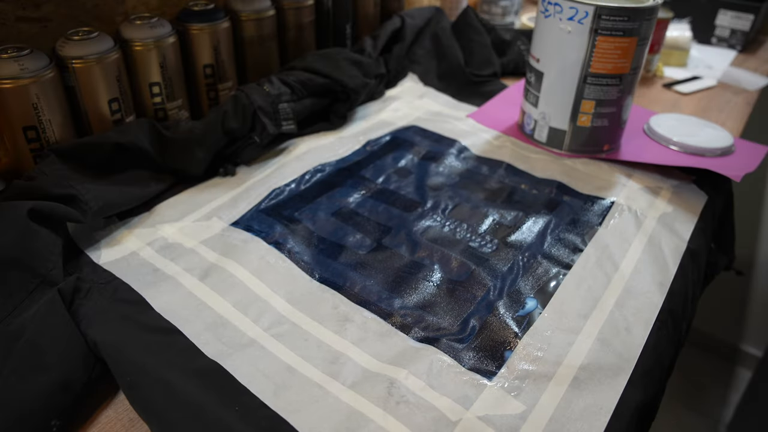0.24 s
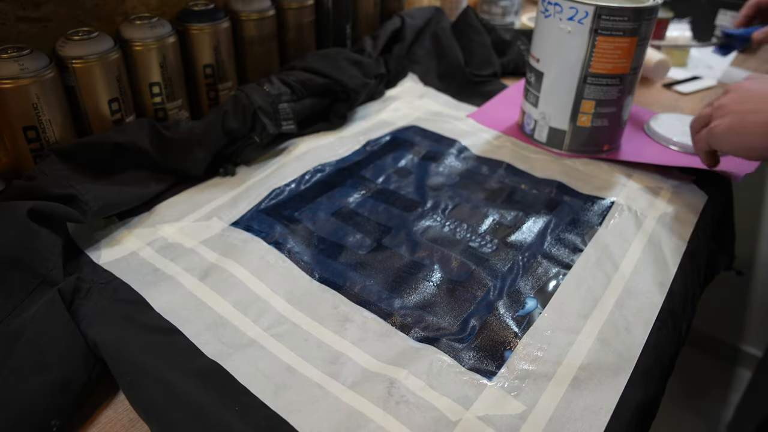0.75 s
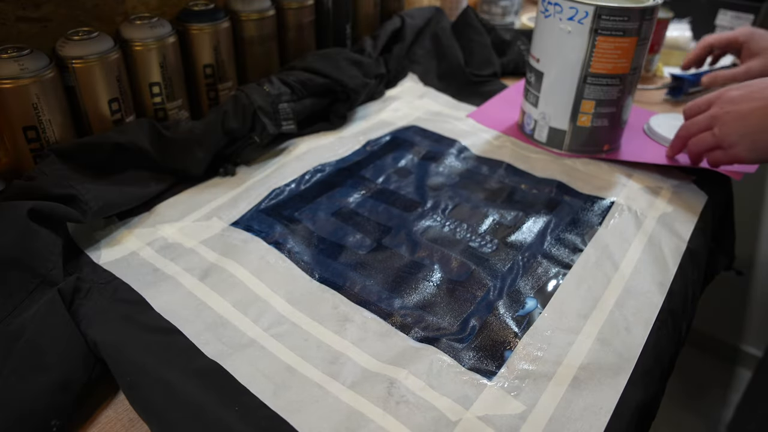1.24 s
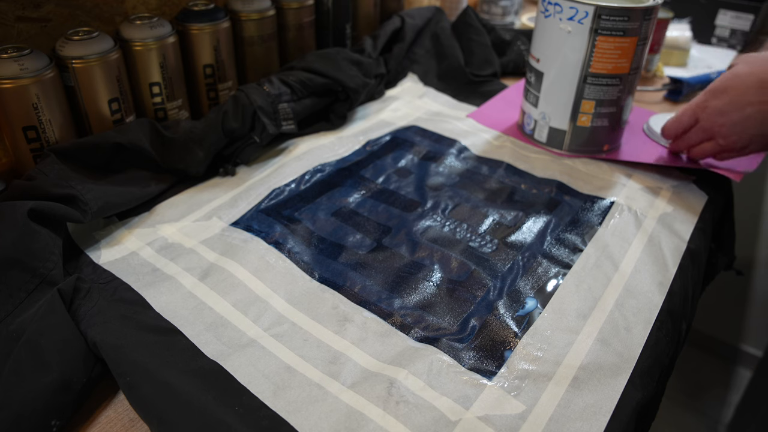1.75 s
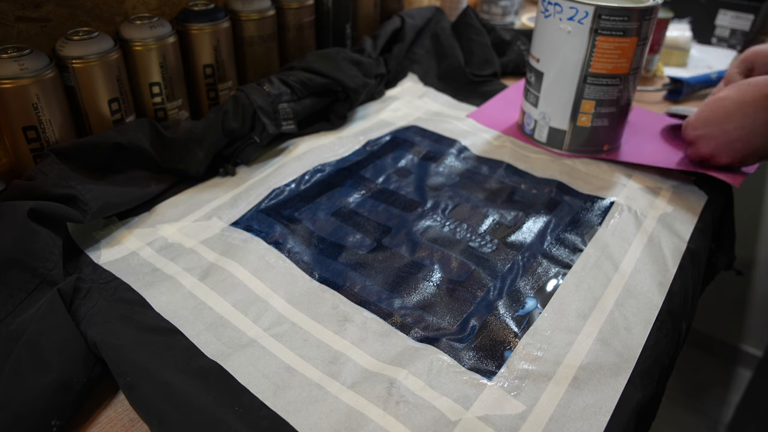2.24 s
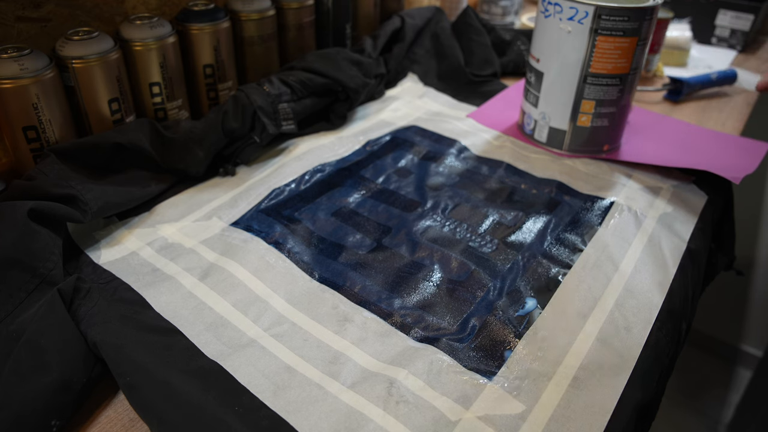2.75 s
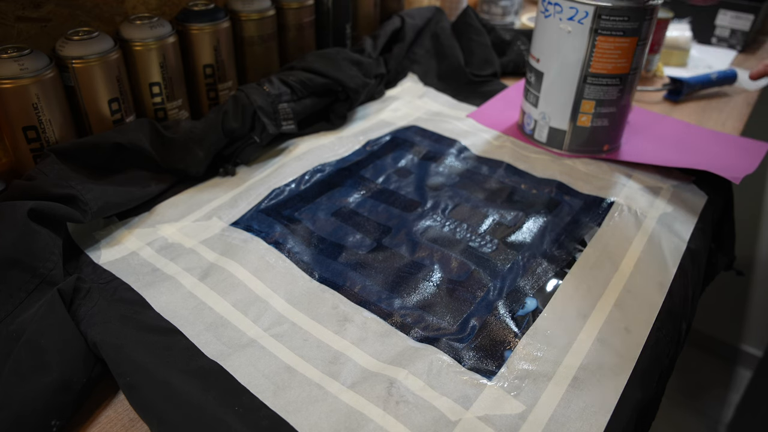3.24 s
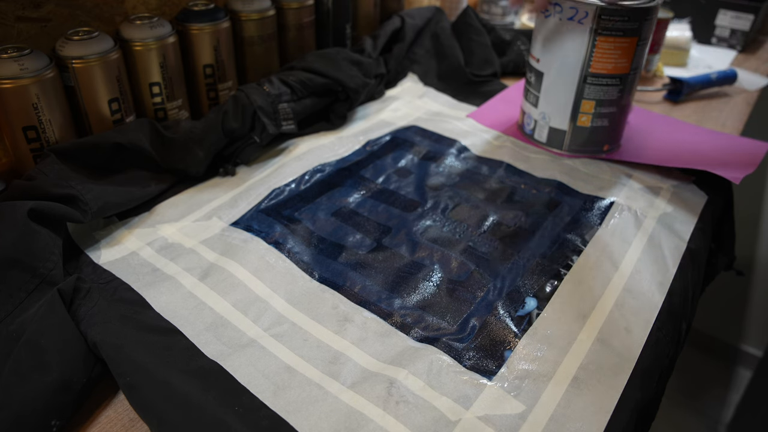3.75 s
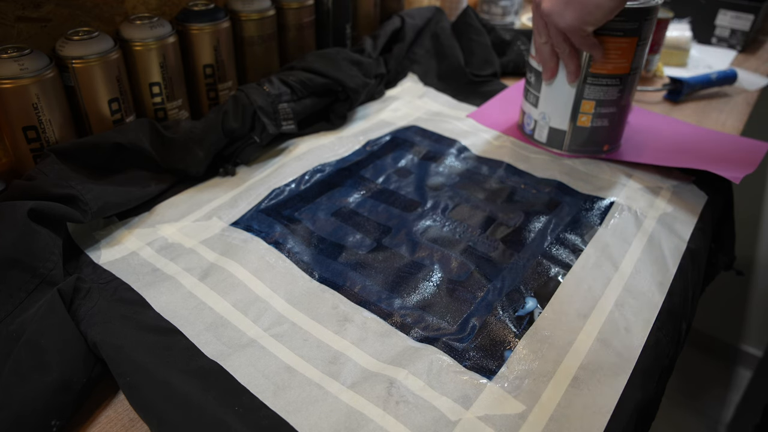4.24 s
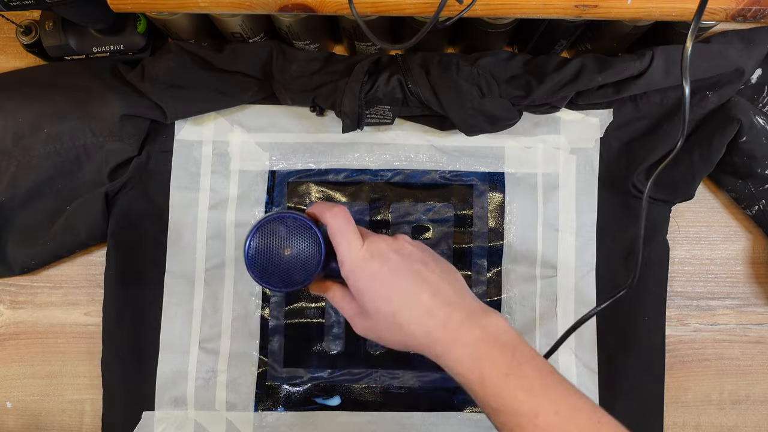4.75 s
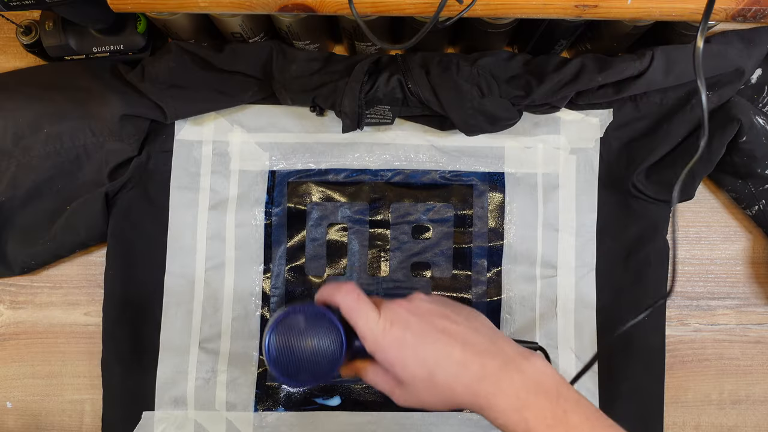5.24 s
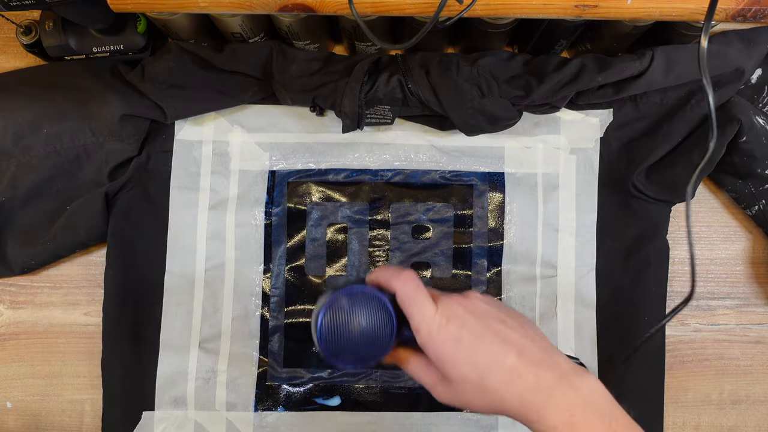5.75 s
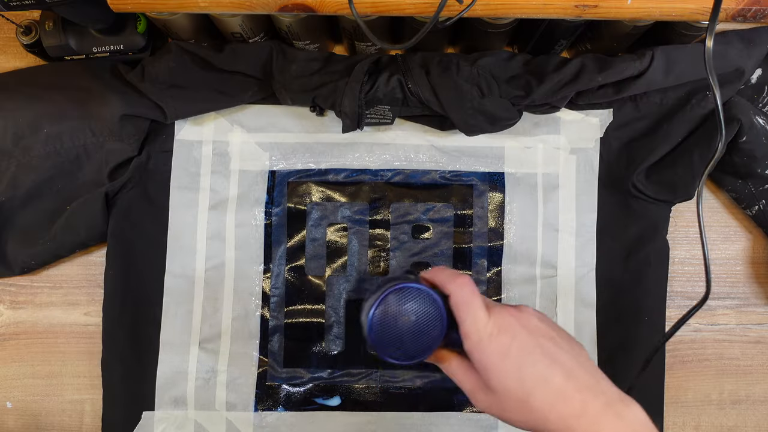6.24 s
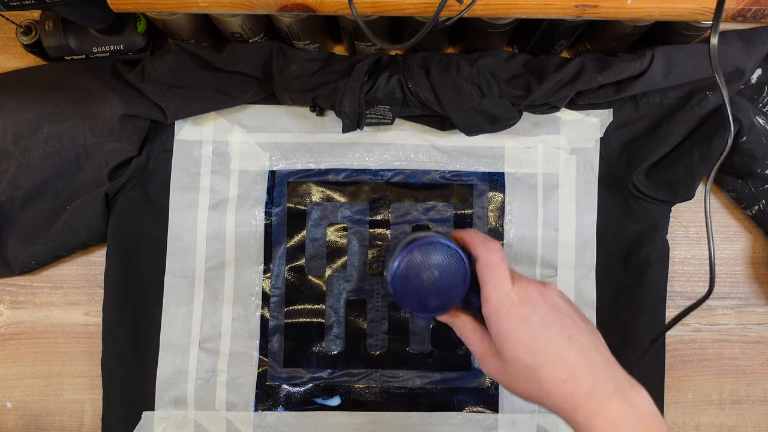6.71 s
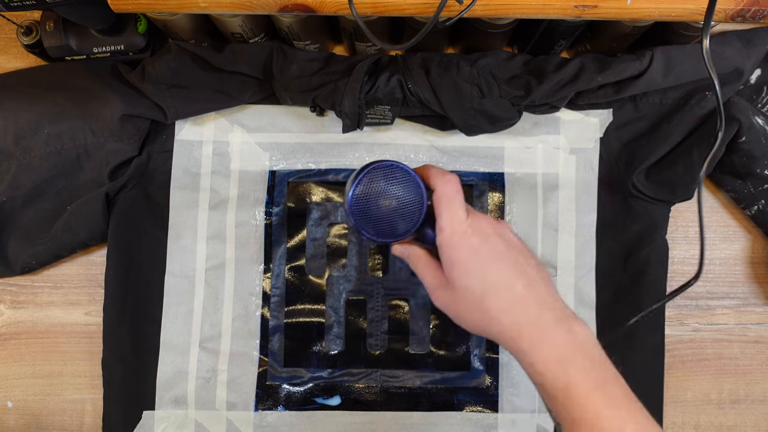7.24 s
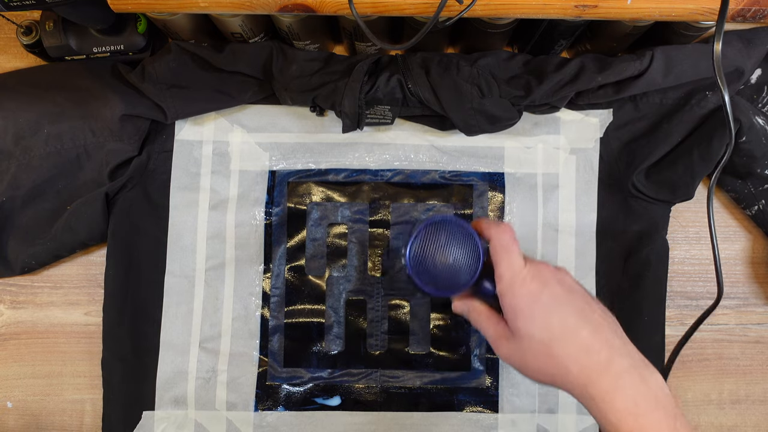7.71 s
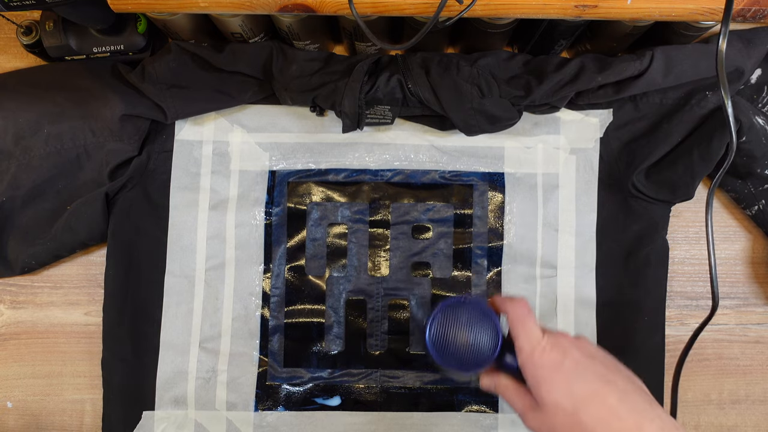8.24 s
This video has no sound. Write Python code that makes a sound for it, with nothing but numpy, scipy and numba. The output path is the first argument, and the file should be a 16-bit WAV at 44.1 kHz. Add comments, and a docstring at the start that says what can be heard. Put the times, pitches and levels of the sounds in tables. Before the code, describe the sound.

In a quiet small workshop, a roller handle clicks and taps, then drops on the table in a quick, fading run of bounces. Hands rub over card, a tin lid scrapes off the edge and clacks down brightly. Soft bumps follow. Suddenly a hair dryer cuts in with a loud hollow bang close to the microphone, then whines and roars steadily, wavering as it is waved.

```python
"""A small workshop, at the table: a paint roller clicks, is put down and bounces.
A tin lid is slid off a card and clacked down; a few soft bumps follow.
A hair dryer cuts in, with a hollow bang close to the microphone, and is waved over the cloth.
Its seven-blade fan whines as a sine tone over rushing air made of coloured noise.
Blows are noise cracks with damped ringing modes; rubbing is grainy noise in slow swells."""
import sys
import numpy as np
from scipy import signal
from scipy.fft import rfft, irfft, next_fast_len
from scipy.io import wavfile
from scipy.ndimage import uniform_filter1d, map_coordinates
from numba import njit

SR = 44100
rng = np.random.default_rng(int(sys.argv[2]) if len(sys.argv) > 2 else 0)


def wrap_up_sound(samples):
    """Save the sound to the file named by the first command line argument, as 16-bit audio."""
    columns = np.atleast_2d(samples).T
    # keep every value between -1 and 1, then stretch to whole-number steps
    tamed = np.clip(columns, -1, 1)
    steps = np.round(tamed * 32767).astype(np.int16)
    wavfile.write(sys.argv[1], SR, steps)


N = 373968
T = np.arange(N) / SR
RING_T = T[:SR]  # one second for each blow to ring out

# In all blow tables brightness_db counts relative to that of the strongest blow of its table.
# Steady murmur of the workshop: pitch_hz, level_db
SHOP_COLOUR = [(20, -13), (44, -11), (110, -11.5), (178, -11.5), (209, -8.5), (289, -10.5), (410, -8.5),
               (567, -11.5), (871, -15.5), (1200, -17), (15500, -39.5)]
SHOP_DB = -64
# Strokes of hand, sleeve and lid over card and cloth: peak_s, rise_s, fall_s, rub_db, hiss_db
STROKES = [(0.36, 0.7, 0.6, -61.5, -68.5), (0.79, 0.12, 0.48, -55, -62.5), (1.25, 0.12, 0.73, -54, -63),
           (1.66, 0.1, 0.4, -52, -63.5), (2.0, 0.078, 0.15, -54, -61.5), (2.19, 0.25, 0.45, -57, -59),
           (2.335, 0.025, 0.051, -48.5, -46.5), (3.55, 0.12, 0.31, -70, -70.5), (4.15, 0.19, 1, -58, -69.5)]
# Low rubbing and high hiss of the strokes: pitch_hz, level_db
RUB_COLOUR = [(240, -30), (400, -6), (515, -8.5), (1240, -2), (1390, -3), (4090, -9.5), (5000, -14),
              (6500, -44.5), (11000, -120)]
HISS_COLOUR = [(2650, -43), (4500, -8.5), (5860, -1.5), (6360, 0), (7130, -4.5), (8680, -4.5), (10700, -17),
               (13800, -17.5), (15500, -23)]
# Dull taps, each with one short resonance and its overtone: start_s, level_db, pitch_hz
TAPS = [(0.079, -40.5, 1100), (0.314, -47.5, 930), (0.421, -47.5, 436), (0.469, -37, 1116),
        (0.545, -36, 1150), (0.697, -40.5, 1270), (1.024, -55, 354), (1.192, -36.5, 1300),
        (3.288, -38, 323), (3.320, -50, 326), (3.456, -43.5, 236), (3.486, -46, 224)]
# Roller handle clicks: start_s, level_db, brightness_db
CLICKS = [(0.119, -14, -12.5), (0.169, -39.5, -1), (0.5095, -30, -10), (0.515, -36.5, 2.5),
          (1.098, -39.5, -6), (1.197, -30.5, -11)]
# Crack of the handle: pitch_hz, level_db
CLICK_COLOUR = [(120, -48), (200, -26), (419, -16.5), (560, -24), (775, -4.5), (1330, -4), (2130, -5.5),
                (2650, -9.5), (4010, -14.5), (4640, -22), (5260, -19.5), (5860, -31), (15000, -58)]
# Ringing of the handle: pitch_hz, level_db, t60_s
HANDLE_MODES = [(1200, -4, 0.12), (1310, 4, 0.071), (1610, -6, 0.053), (1770, -19, 0.052), (1950, -3, 0.09),
                (2940, -25, .05), (3327, -40, .07), (3920, -6, 0.071)]
# Soft bumps on the table: start_s, level_db, brightness_db
BUMPS = [(0.325, -52.5, -13), (3.286, -41.5, -11), (3.453, -57, 9), (3.811, -41, 4), (3.816, -47, -6),
         (3.952, -36, 2), (3.957, -40.5, 1), (3.993, -48, -16), (4.373, -53.5, 13.5), (4.397, -54, 6)]
# Crack of the bumps: pitch_hz, level_db
BUMP_COLOUR = [(24, -45), (40, -8.5), (193, 0), (283, -8), (351, -19), (552, -6), (849, -26), (934, -10.5),
               (1130, -17.5), (1660, -15), (12000, -48), (15600, -81), (22000, -120)]
# Ringing of the bumped table: pitch_hz, level_db, t60_s
BUMP_MODES = [(203, -8, 0.12), (233, -1, 0.12), (358, 12, 0.11)]
# The roller drops on the table: first blow, first flight, share of speed kept by each rebound
DROP_S, FIRST_FLIGHT_S, REBOUND = 1.254, 0.076, 0.795
# First blow; loss of level and of treble per bounce
DROP_DB, BOUNCE_LOSS_DB, BOUNCE_DULLING_DB = -20.5, 2.17, 0.76
# Crack of roller on table: pitch_hz, level_db
BOUNCE_COLOUR = [(45, -31), (90, 7), (250, -12), (352, 2), (455, -16), (600, -8.5), (844, -10.5),
                 (1090, -9), (1760, -14.5), (3050, -9), (4370, -21.5), (5850, -11), (8100, -25),
                 (15000, -34.5)]
# Ringing of the table under the roller: pitch_hz, level_db, t60_s
TABLE_MODES = [(76, -2, 0.22), (98.5, 3, 0.23), (182.5, 0.5, 0.15), (346, -7.5, 0.16), (605, -7, 0.11),
               (1050, -9, 0.093), (2156, -5.5, 0.077), (3000, 1, 0.031), (5830, -11, 0.1),
               (7220, -10, 0.047)]
# The lid's rim scrapes over the table edge: peak_s, rise_s, fall_s, level_db
SCRAPES = [(2.248, 0.028, 0.22, -45), (2.335, 0.049, 0.066, -39.5)]
# Ringing of the scraped rim: pitch_hz, level_db, t60_s
RIM_MODES = [(639, -10, 0.15), (913, -5, 0.099), (1084, -3, .06), (1180, -4, 0.05), (1278, -2, 0.083),
             (1470, -11, 0.11), (1520, -16, 0.19), (1996, -10.5, 0.15)]
# The lid rings as it slips off the edge, then is clacked down: start_s, level_db, brightness_db
LID_BLOWS = [(2.340, -34, -29), (2.9415, -12, 3)]
# Crack of the lid: pitch_hz, level_db
LID_COLOUR = [(40, -38), (100, -18.5), (380, -12), (480, -7), (825, -14), (1290, -3.5), (1620, -12),
              (1850, -14.5), (2600, -1), (3850, -14), (4500, -13), (6900, -15.5), (7600, -25), (15500, -44)]
# Ringing of the lid: pitch_hz, level_db, t60_s
LID_MODES = [(474.5, -10.5, 0.42), (584.4, -8, 0.25), (1285, -5.5, 0.15), (1386, -13.5, 0.15),
             (1627, 6, 0.18), (1650, -11, .15), (1980, -7.5, 0.21), (2370, -5, 0.18), (2566, 2.5, 0.18),
             (2600, -5.5, .14), (2790, -6, 0.13), (2910, -11.5, .2), (3080, -2.5, 0.2), (3155, -9, 0.12),
             (3770, -6, 0.26), (3767, -5, 0.24), (3980, -10, .26), (4080, -10, .11), (4930, -7.5, .1),
             (5240, -10, 0.12), (6000, -17.5, .18), (6400, -14, .18), (6650, -13, .16)]
DRYER_ON_S, BLADES = 4.471, 7
# Motor speed as the blade rate: start_s, pitch_hz
BLADE_RATE = [(4.5, 1393), (4.78, 1390), (4.94, 1401), (5.7, 1384), (6.82, 1373), (8.21, 1387),
              (8.48, 1377)]
# Whine, coming and going as the dryer is waved, before the fan's overall gain: start_s, level_db
WHINE = [(4.66, -36.5), (4.72, -38.5), (5.04, -32), (5.18, -40), (5.3, -34), (5.36, -39.5), (6.1, -43),
         (6.76, -40.5), (6.8, -35.5), (6.88, -41), (7.02, -34), (7.14, -43), (7.18, -36.5), (7.32, -35),
         (7.38, -41), (7.6, -34), (7.9, -38.5), (7.96, -34.5), (8.12, -38), (8.44, -40.1)]
# Weaker motor tones: multiple of the shaft rate, level_db
MOTOR_ORDERS = [(1, -55), (2, -59.5), (4, -64), (5, -43), (8, -46.5), (11, -49), (14, -51.5), (15, -53),
                (21, -52.5), (28, -55)]
HUM_HZ, HUM_DB = 101, -71  # mains hum
# Air, before the gains of roar and nozzle: start_s, roar_db, jet_db, nozzle_hz
AIR = [(4.75, -32, -36, 2191), (5.0, -33.5, -35.5, 2105), (5.9, -34, -37, 2100), (6.8, -34.5, -37.5, 2232),
       (7.15, -34, -36.5, 2108), (7.5, -35, -37.5, 2270), (8.2, -35, -37, 2310), (8.35, -34.5, -37, 2242)]
# Roar in the barrel and hiss of the jet: pitch_hz, level_db
ROAR_COLOUR = [(20, -58), (100, -36), (180, -10.5), (240, -12.5), (310, -5), (450, -8.5), (660, -1),
               (710, -2), (770, 6.5), (880, 3), (940, 0.5), (1200, 1), (1500, -4.5), (1850, -4),
               (3200, -41), (16000, -67)]
JET_COLOUR = [(1500, -39.5), (2500, -2), (2950, 1), (3150, -0.5), (3450, 2), (4150, 0.5), (4450, -1.5),
              (4850, 1), (7100, -6), (8700, -5), (10400, -17), (13400, -18), (16000, -29.5)]
# Gusts brush the microphone: peak_s, rise_s, fall_s, level_db
GUSTS = [(4.532, 0.008, 0.29, -38), (5.07, 0.078, 0.078, -54), (5.87, 0.08, 0.19, -55)]
# Rumble of the gusts: pitch_hz, level_db
GUST_COLOUR = [(20, -11), (45, 2), (78, 4), (120, 0), (300, -22), (900, -62)]
# Something hollow is knocked and rattles: start_s, level_db, brightness_db
BANGS = [(4.528, -5.5, 4.5), (4.554, -21, -2), (4.570, -18, -1), (4.578, -10, 0.5), (4.585, -17, 4),
         (4.601, -22, -2), (4.616, -17.5, 2)]
# Crack of the hollow thing: pitch_hz, level_db
BANG_COLOUR = [(15, -59), (25, -29), (204, -17), (274, -24), (331, -12), (482, -15.5), (582, -12.5),
               (703, -3.5), (848, -7.5), (1020, -18), (1450, -16.5), (2300, -22), (3440, -28.5),
               (8130, -39.5), (15500, -62)]
# Ringing of the hollow thing: pitch_hz, level_db, t60_s
BANG_MODES = [(346, -29, 0.22), (474, -19, 0.24), (582, -15, 0.25), (720, -2.5, 0.46), (758, -4, 0.31),
              (836, 1, 0.32), (1574, -3, 0.16), (1700, -4, 0.098), (3450, -8, 0.082)]
TOP_HZ = 15900  # upper limit of the recorder


def amp(db):
    """Decibels to gain."""
    return 10 ** (np.asarray(db) / 20)


def unit(x):
    """Scale to rms 1."""
    return x / np.sqrt(np.mean(x ** 2))


def curves(rows):
    """Each column of a table, joined by straight lines in time."""
    start_s, *columns = np.transpose(rows)
    return [np.interp(T, start_s, column) for column in columns]


def walk(rate_hz):
    """Smooth random motion with spread 1: held random values, averaged twice."""
    hold = int(SR / rate_hz)
    steps = np.repeat(rng.standard_normal(N // hold + 1), hold)
    smooth = uniform_filter1d(uniform_filter1d(steps, hold), hold)
    return unit(smooth[:N])


def colour(x, points):
    """Causal minimum-phase filter with the given (Hz, dB) outline."""
    size = 2 * next_fast_len(len(x))
    hz, db = np.transpose(points)
    bins_hz = np.maximum(np.arange(size // 2 + 1) * SR / size, 1)
    outline_db = np.interp(np.log(bins_hz), np.log(hz), db)
    cepstrum = irfft(np.log(amp(outline_db)))
    cepstrum[1:size // 2] *= 2  # fold the backward half forward in time
    cepstrum[size // 2 + 1:] = 0
    response = np.exp(rfft(cepstrum))
    return irfft(rfft(x, size) * response)[:len(x)]


def noise(points):
    """Coloured noise with rms 1."""
    return unit(colour(rng.standard_normal(N), points))


def lowpass(x, hz):
    """Gentle second-order low-pass."""
    return signal.sosfilt(signal.butter(2, min(hz, SR / 2 - 1), fs=SR, output="sos"), x)


def fade(t60_s):
    """Decay by 60 dB in t60_s seconds."""
    return np.exp(-np.log(1000) * RING_T / t60_s)


def ring(modes):
    """Ringing of a struck body: damped sines, each of random sign."""
    out = 0
    for hz, db, t60_s in modes:
        sign = rng.choice([-1, 1])
        out = out + amp(db) * sign * fade(t60_s) * np.sin(2 * np.pi * hz * RING_T)
    return out


def attack(x, size=220):
    """Scale a blow so that its first 5 ms have rms 1."""
    return x / np.sqrt(np.mean(x[:size] ** 2))


@njit
def resonance(x, centre_hz, width_hz):
    """Band-pass whose centre may move."""
    out, band, low = np.empty(len(x)), 0., 0.
    for i in range(len(x)):
        g, damping = np.tan(np.pi * centre_hz[i] / SR), width_hz / centre_hz[i]
        v = (band + g * (x[i] - low)) / (1 + g * (g + damping))
        band, low, out[i] = 2 * v - band, low + 2 * g * v, damping * v
    return out


def strikes(rows, outline, modes, crack_db, crack_t60, tick_db, modes_db, bright_hz):
    """Blows on one body: a contact tick, a crack of dense fast modes, and its few lasting modes."""
    out, body = np.zeros(N + SR), attack(ring(modes))
    usual_db = max(rows, key=lambda row: row[1])[2]  # the strongest blow has the plain colour
    for start_s, level_db, brightness_db in rows:
        crack = rng.standard_normal(SR) * fade(crack_t60)
        crack[0] += amp(tick_db)
        blow = amp(crack_db) * attack(colour(crack, outline)) + amp(modes_db) * body
        tilt_db = brightness_db - usual_db  # soft contact loses treble
        blow = colour(blow, [(bright_hz / 2, 0), (bright_hz, tilt_db)])
        start = int(start_s * SR)
        out[start:start + SR] += amp(level_db) * blow
    return out[:N]


def room(x, wet_db, low_t60=0.36, high_t60=0.29, split_hz=2500, build_s=0.01, bass_hz=190):
    """Add the echo of the small workshop; it holds little bass and its treble dies first."""
    bass_cut = signal.butter(2, bass_hz, "high", fs=SR, output="sos")
    scatter = signal.sosfilt(bass_cut, rng.standard_normal(SR))
    low = signal.sosfiltfilt(signal.butter(2, split_hz, fs=SR, output="sos"), scatter)
    high = scatter - low
    build = 1 - np.exp(-(RING_T / build_s) ** 2)
    echo = (low * fade(low_t60) + high * fade(high_t60)) * build
    return x + amp(wet_db) * signal.fftconvolve(x, echo / np.linalg.norm(echo))[:N]


def swells(rows):
    """Gain of overlapping swells; rise_s and fall_s each span 20 dB."""
    power = 0
    for peak_s, rise_s, fall_s, level_db in rows:
        below = np.where(T < peak_s, ((peak_s - T) / rise_s) ** 2, (T - peak_s) / fall_s)
        power = power + amp(level_db - 20 * below) ** 2
    return np.sqrt(power)


def shop_murmur():
    """The empty workshop: coloured noise whose level drifts slightly."""
    return amp(SHOP_DB + 0.49 * walk(5.0)) * noise(SHOP_COLOUR)


def brushing(grain_db=1.5):
    """Fibres catch and slip as things brush the table, which makes the noise grainy."""
    rub = swells([(peak, rise, fall, db) for peak, rise, fall, db, _ in STROKES])
    hiss = swells([(peak, rise, fall, db) for peak, rise, fall, _, db in STROKES])
    grain = unit(amp(grain_db * walk(250)))
    return grain * (rub * noise(RUB_COLOUR) + hiss * noise(HISS_COLOUR))


def taps(cycles=27, overtone_db=-6, overtone=1.26, contact_db=-13, rise_cycles=1.8):
    """A padded contact eases a close pair of damped modes into motion; low ones last longer."""
    out = np.zeros(N + SR)
    for start_s, level_db, hz in TAPS:
        t60_s = cycles / hz
        body = attack(ring([(hz, 0, t60_s), (hz * overtone, overtone_db, t60_s)]))
        contact = attack(lowpass(rng.standard_normal(SR) * fade(t60_s), hz=2 * hz))
        push = 1 - np.exp(-RING_T * hz / rise_cycles)
        start = int(start_s * SR)
        out[start:start + SR] += amp(level_db) * push * (body + amp(contact_db) * contact)
    return room(out[:N], wet_db=-8.0)


def handle_clicks():
    """The roller handle clicks: a sharp tick with short handle modes."""
    dry_clicks = strikes(CLICKS, CLICK_COLOUR, HANDLE_MODES, crack_db=-12.5, crack_t60=0.043,
                         tick_db=21, modes_db=-21.0, bright_hz=2970)
    return room(dry_clicks, wet_db=-11.5)


def table_bumps():
    """Soft bumps on the table: hardly any tick, mostly low crack and table modes."""
    dry_bumps = strikes(BUMPS, BUMP_COLOUR, BUMP_MODES, crack_db=-2.0, crack_t60=0.085,
                        tick_db=-4, modes_db=-11, bright_hz=900)
    return room(dry_bumps, wet_db=-9)


def roller_bounces(count=10):
    """Each rebound keeps a share of its speed, so blows come sooner, softer and duller."""
    k = np.arange(count)
    start_s = DROP_S + FIRST_FLIGHT_S * (1 - REBOUND ** k) / (1 - REBOUND)  # geometric flights
    blows = list(zip(start_s, DROP_DB - BOUNCE_LOSS_DB * k, -BOUNCE_DULLING_DB * k))
    dry_bounces = strikes(blows, BOUNCE_COLOUR, TABLE_MODES, crack_db=-10.0, crack_t60=0.086,
                          tick_db=11.5, modes_db=-7.5, bright_hz=3000)
    return room(dry_bounces, wet_db=-8.5, bass_hz=110)


def rim_scrapes(grain_db=5):
    """The rim catches and slips on the table edge; the slips ring the lid."""
    slips = unit(rng.standard_normal(N) * amp(grain_db * walk(400))) * swells(SCRAPES)
    rim = ring(RIM_MODES)
    return signal.fftconvolve(slips, rim / np.linalg.norm(rim))[:N]


def lid_clack():
    """The tin lid, struck twice, rings in many close modes."""
    dry_clack = strikes(LID_BLOWS, LID_COLOUR, LID_MODES, crack_db=0.5, crack_t60=.055,
                        tick_db=12, modes_db=-6.5, bright_hz=3390)
    return room(dry_clack, wet_db=-6)


def fan(whine_db=2.0, wobble=0.001984, flutter_db=1.2, wander_db=4, throb_db=2.5):
    """The blade tone and weaker shaft orders; each swells and fades as the dryer moves."""
    (blade_hz,), (blade_db,) = curves(BLADE_RATE), curves(WHINE)
    shaft_hz = blade_hz / BLADES * (1 + wobble * walk(45))
    turn = 2 * np.pi * np.cumsum(shaft_hz) / SR
    whine = amp(blade_db + whine_db + flutter_db * walk(40)) * np.sin(BLADES * turn)
    orders = 0
    for k, db in MOTOR_ORDERS:
        # short waves change more with the hand's position
        swing_db = np.interp(k, [1, BLADES], [throb_db, wander_db])
        orders = orders + amp(db) * unit(amp(swing_db * walk(14)) * np.sin(round(k) * turn))
    hum = amp(HUM_DB) * unit(np.sin(2 * np.pi * HUM_HZ * T))
    return np.sqrt(2) * whine + orders + hum


def air(roar_gain_db=0.55, nozzle_db=-1.96, pass_width_hz=500, flicker_db=.5,
        echo_s=.0021, sway=0.09, echo_share=0.23):
    """Turbulence roars in the barrel and hisses at the nozzle; the table's echo shifts with the hand."""
    roar_db, jet_db, nozzle_hz = curves(AIR)
    roar = amp(roar_db + roar_gain_db + flicker_db * walk(14)) * noise(ROAR_COLOUR)
    nozzle = rng.standard_normal(N)
    for _ in range(2):  # twice for steep flanks
        nozzle = resonance(nozzle, nozzle_hz, float(pass_width_hz))
    jet = noise(JET_COLOUR) + amp(nozzle_db) * unit(nozzle)
    rush = roar + amp(jet_db + flicker_db * walk(22)) * jet
    lag_s = echo_s * (1 + sway * walk(2))
    echo = map_coordinates(rush, [(T - lag_s) * SR], order=3)
    return rush + echo_share * echo


def gusts():
    """Moving air brushes the microphone as swells of low noise."""
    return swells(GUSTS) * noise(GUST_COLOUR)


def hair_dryer():
    """Fan, air and gusts, cut in together within about half a millisecond."""
    running = np.clip((T - DRYER_ON_S) / 0.00052, 0, 1)
    return running * (fan() + air() + gusts())


def hollow_bangs():
    """A hollow body is knocked and rattles: strong ticks over longer low modes."""
    dry_bangs = strikes(BANGS, BANG_COLOUR, BANG_MODES, crack_db=1, crack_t60=0.029,
                        tick_db=20.0, modes_db=-10.0, bright_hz=2500)
    return room(dry_bangs, wet_db=-6.5)


def scene():
    """All sources reach one microphone, the same on both channels."""
    mono = shop_murmur() + brushing() + taps() + handle_clicks() + table_bumps()
    mono = mono + roller_bounces() + rim_scrapes() + lid_clack()
    mono = mono + hair_dryer() + hollow_bangs()
    return np.array([mono, mono])


def record(dry):
    """The recorder flattens the highest peaks and cuts the top."""
    clipped = np.clip(dry, -.87, .87)
    top_cut = signal.ellip(10, .1, 80, TOP_HZ, fs=SR, output="sos")
    return signal.sosfilt(top_cut, clipped)


dry = scene()
out = record(dry)
wrap_up_sound(out)
```